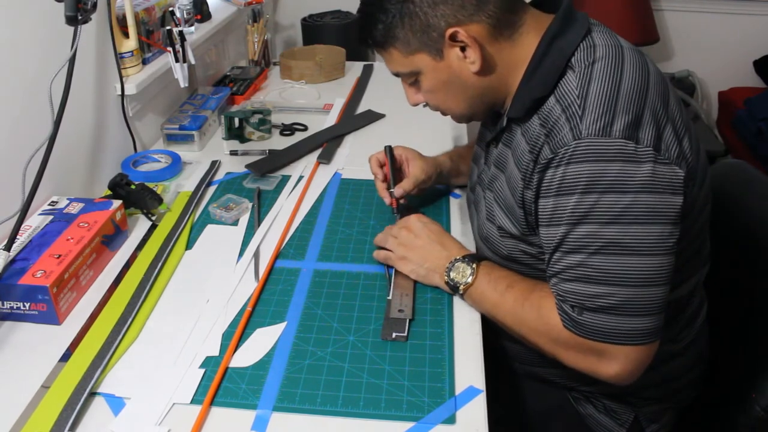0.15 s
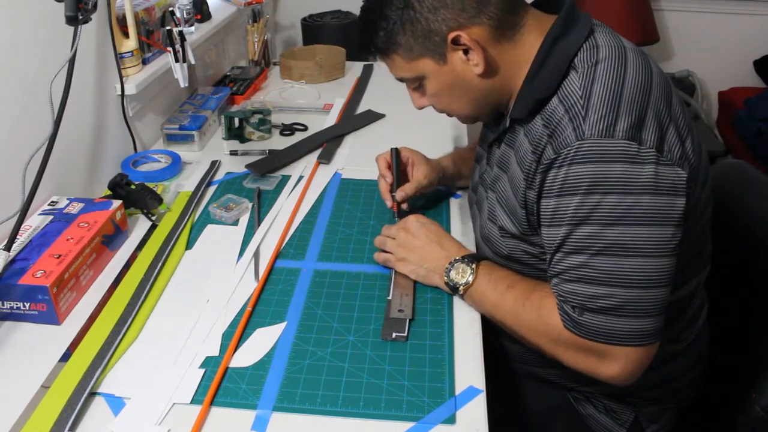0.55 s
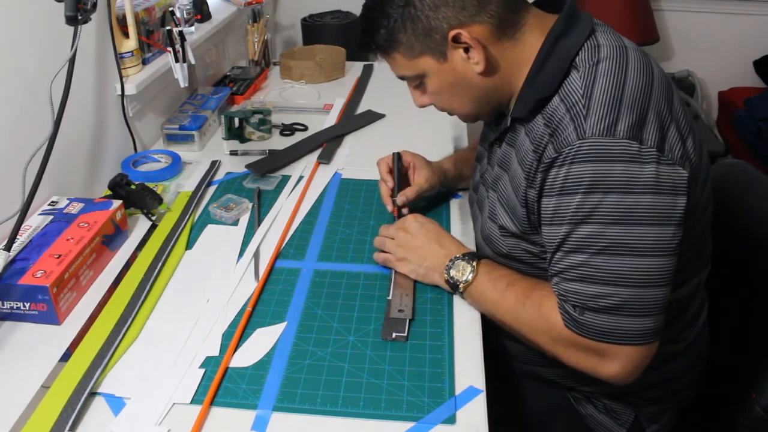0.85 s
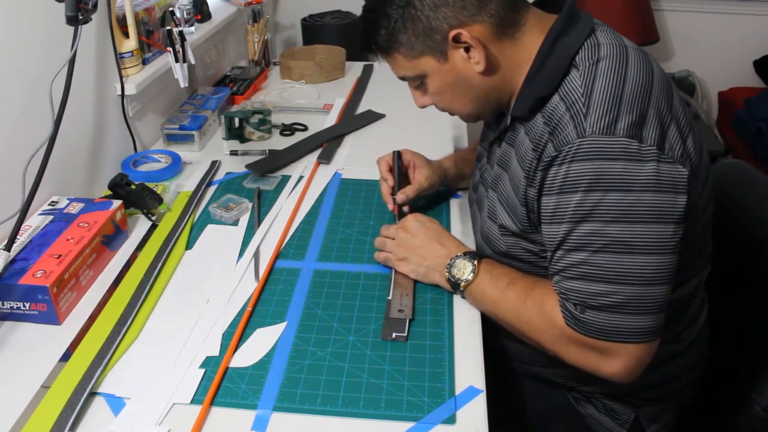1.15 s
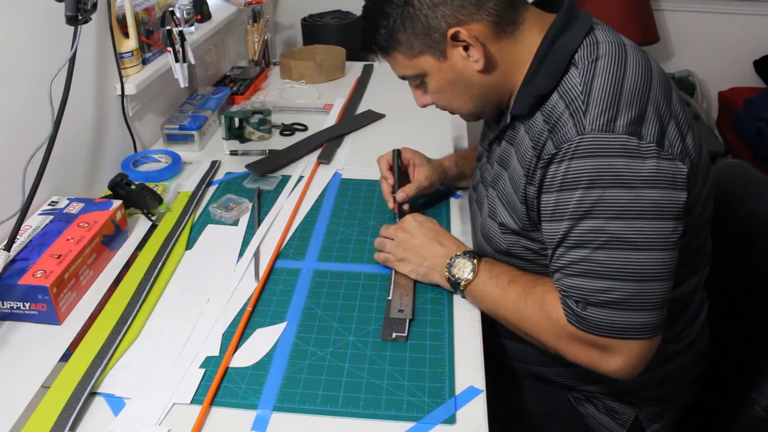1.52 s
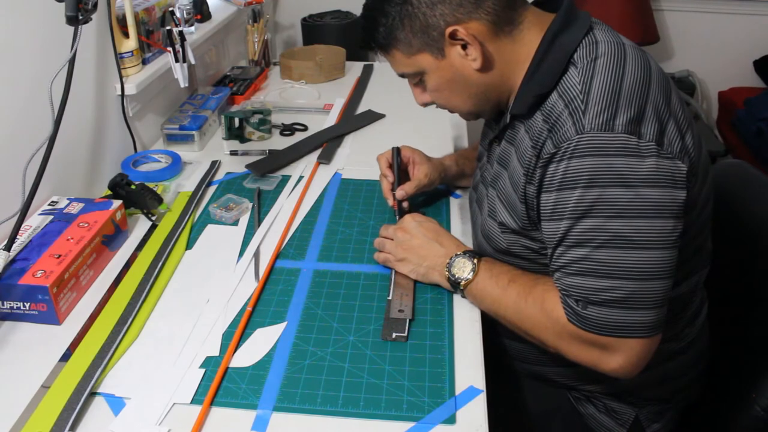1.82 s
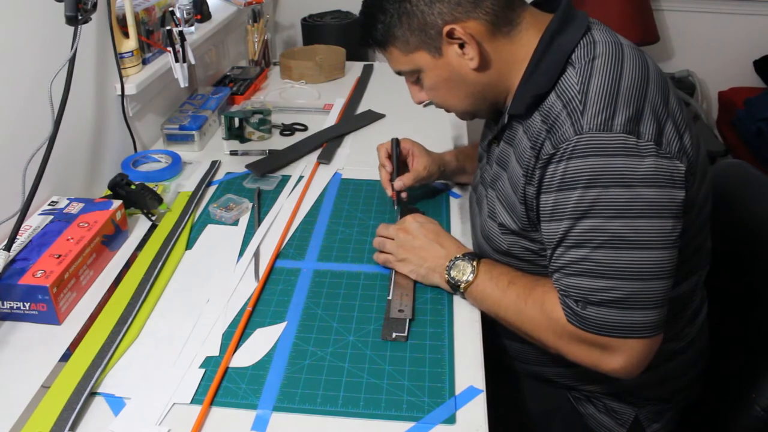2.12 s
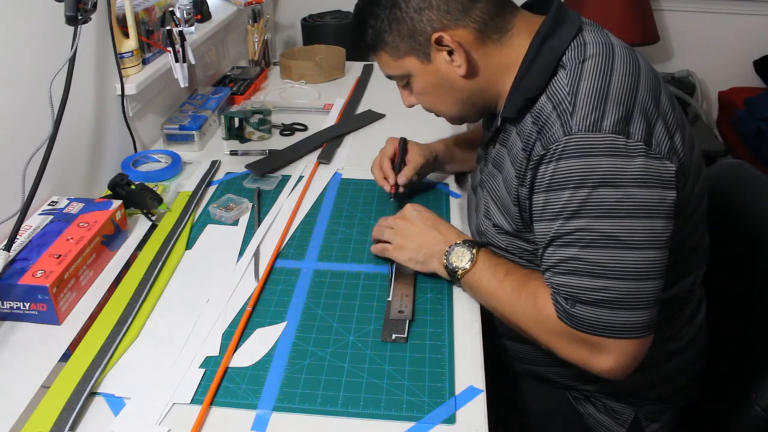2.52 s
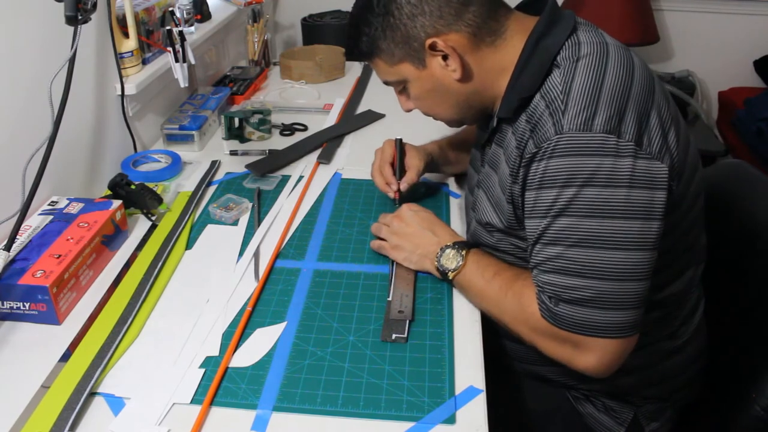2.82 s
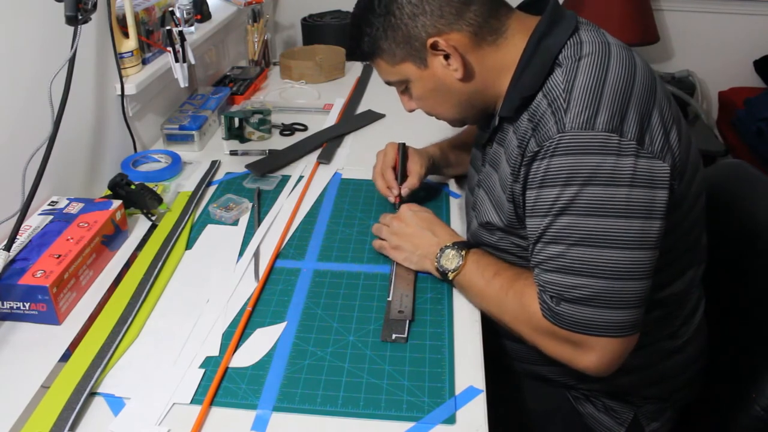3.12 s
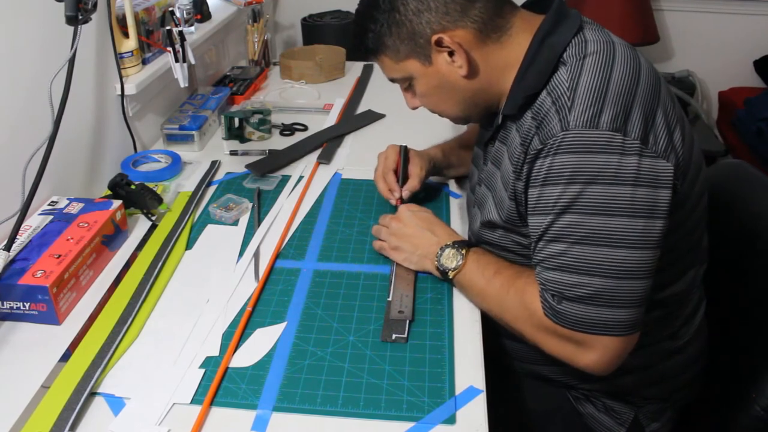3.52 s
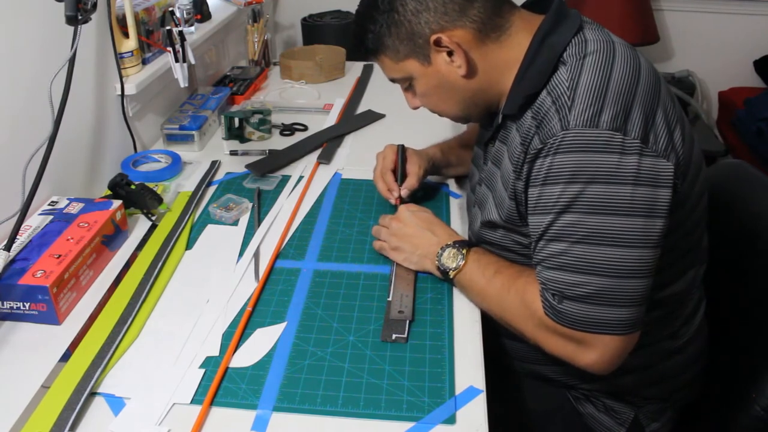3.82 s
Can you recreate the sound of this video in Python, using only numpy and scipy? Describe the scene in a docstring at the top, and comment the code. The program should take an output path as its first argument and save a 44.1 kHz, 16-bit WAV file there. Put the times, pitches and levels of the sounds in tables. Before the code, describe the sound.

A hobby knife crackles through foam sheet in short strokes, with sharp snaps at the start and around 0.6 seconds. After a light slide, more cuts come from 1.8 to 2.2 seconds, one briefly ringing the metal ruler. Foam and ruler shift from 2.4 seconds, with a soft desk knock at 3.3 and a last small cut near 3.9. A fan hums low throughout in the small room.

```python
"""A desk in a small room: a hobby knife cuts foam sheet along a metal ruler.
The blade crackles through the foam in short strokes and snaps onto the mat.
Foam and ruler are shifted, with one soft knock on the desk.
A fan motor hums throughout, beating slowly against the mains hum, over its own air noise."""
import sys
import numpy as np
from scipy import signal
from scipy.fft import rfft, irfft, next_fast_len
from scipy.io import wavfile

SR = 44100
rng = np.random.default_rng(int(sys.argv[2]) if len(sys.argv) > 2 else 0)


def wav_out(sig):
    """Save sig, one row per channel (or a flat mono array), as 16-bit PCM at SR to the path in sys.argv[1]."""
    wavfile.write(sys.argv[1], SR, np.round(np.clip(np.atleast_2d(sig).T, -1, 1) * 32767).astype(np.int16))


N = 174195


def undb(db):
    """Decibels to gain."""
    return 10 ** (np.asarray(db) / 20)


def unit(x):
    """Scale to rms 1."""
    return x / np.sqrt(np.mean(x ** 2))


def decay(t, t60_s):
    """Exponential fall, 60 dB in t60_s."""
    return np.exp(-np.log(1000) * t / t60_s)


def colour(x, points, tilt_db_oct=0):
    """Minimum-phase filter of unit power gain through (Hz, dB) points, tilted above 750 Hz."""
    size = next_fast_len(len(x) + 8192)
    size += size % 2
    octave = np.log2(np.maximum(np.fft.rfftfreq(size, 1 / SR), 1))
    hz, db = np.array(points).T
    tilt_db = tilt_db_oct * np.maximum(octave - np.log2(3000), -2)
    gain = unit(undb(np.interp(octave, np.log2(hz), db) + tilt_db))
    cepstrum = irfft(np.log(gain))
    cepstrum[1:size // 2] *= 2
    cepstrum[size // 2 + 1:] = 0
    return irfft(rfft(x, size) * np.exp(rfft(cepstrum)))[:len(x)]


def walk(rate_hz, n):
    """Smooth random wander, spread near 1."""
    steps = np.arange(n) * rate_hz / SR
    return np.interp(steps, np.arange(1024), rng.standard_normal(1024))


def add(track, start_s, x):
    """Mix x in at start_s."""
    i = max(int(start_s * SR), 0)
    track[i:i + len(x)] += x[:max(N - i, 0)]


def pan(x, left_db):
    """Stereo, left side raised by left_db against the right."""
    return x * undb(np.array([[left_db], [-left_db]]) / 2)


def ring(modes, t):
    """Struck modes dying away, unit energy."""
    x = sum(undb(db) * np.sin(2 * np.pi * hz * t) * decay(t, t60_s) for hz, db, t60_s in modes)
    return x / np.linalg.norm(x)


def fan_air():
    """Steady rush of the fan in the room's low resonances, faint hiss above."""
    # air noise spectra, mid and side: (frequency [Hz], relative density [dB])
    mid_spectrum = [(22, -38), (36, -10.5), (70, -8.5), (105, -11.5), (128, -8.5), (150, 3.5), (172, -3.5),
                    (187, -7), (215, -8.5), (262, -3.5), (285, -6.5), (305, -2.5), (365, -2.5),
                    (405, -11.5), (455, -22.5), (590, -17.5), (720, -23.5), (1100, -26.5), (2000, -33),
                    (4000, -37), (7000, -40.5), (8300, -39), (12000, -44), (15500, -49)]
    side_spectrum = [(18, -36), (30, -5), (48, -7), (85, -29), (97, -8.5), (117, -3), (177, -11),
                     (284, -10.5), (575, -14), (1260, -16.5), (7080, -27.5), (7860, -50), (8720, -61),
                     (10200, -71), (15500, -75)]
    mid = undb(-43) * unit(colour(rng.standard_normal(N), mid_spectrum))
    side = undb(-55) * unit(colour(rng.standard_normal(N), side_spectrum))
    return pan(np.array([mid + side, mid - side]), left_db=-0.06)


def fan_hum():
    """The motor runs just below twice the mains rate, so the two tones beat."""
    # motor harmonics: (multiple, level [dB])
    harmonics = [(1, -38), (2, -56.5), (3, -64.5), (5, -70.5)]
    # fan vibration: (frequency [Hz], level [dB])
    vibration_lines = [(36.3, -58), (54.5, -67.5), (488, -72), (552, -73.5), (763, -71)]
    motor_hz, mains_hum_hz, in_phase_s = 117.6, 119.99, 1.88
    t = np.arange(N) / SR - in_phase_s
    motor = sum(undb(db) * np.cos(2 * np.pi * k * motor_hz * t) for k, db in harmonics)
    mains = undb(-47) * np.cos(2 * np.pi * mains_hum_hz * t)
    shake = sum(undb(db) * np.cos(2 * np.pi * hz * t + .4 * walk(2, N)) for hz, db in vibration_lines)
    waver = undb(0.06 * walk(4.18, N))
    return pan(np.sqrt(2) * ((motor + mains) * waver + shake), left_db=1.06)


def room_response():
    """Quick reflections off desk and wall, then a short diffuse tail whose treble dies first."""
    t = np.arange(SR // 2) / SR
    noise, scatter = rng.standard_normal((2, len(t)))
    low = signal.lfilter(*signal.butter(1, 5000, fs=SR), noise)
    tail = low * decay(t, t60_s=0.4) + (noise - low) * decay(t, t60_s=0.26)
    tail *= np.clip(t / 0.011, 0, 1)
    early = scatter * np.abs(scatter) * np.exp(-t / 0.011) * (t > .001)
    return undb(-2) * (tail / np.linalg.norm(tail) + early / np.linalg.norm(early)) / np.sqrt(2)


def room(x):
    """Direct sound a little to the left, plus stereo reflections."""
    # width of the reflections: (frequency [Hz], side gain [dB])
    width = [(200, -14), (700, -14), (2000, -3), (5500, -1), (7500, -9), (12000, -21)]
    hz, db = np.array(width).T
    mid, side = (signal.fftconvolve(x, room_response())[:N] for _ in range(2))
    size = 2 ** 18
    side_db = np.interp(np.log(np.fft.rfftfreq(size, 1 / SR) + 1), np.log(hz), db)
    side = irfft(rfft(side, size) * undb(side_db))[:N]
    return pan(x, left_db=3.5) + pan(np.array([mid + side, mid - side]), left_db=1.5)


def desk_knock():
    """The hand sets the ruler down; the desk answers dully."""
    # desk modes: (frequency [Hz], relative level [dB], t60 [s])
    desk_modes = [(366, 0.5, 0.076), (470, -3, 0.043), (542, 1.5, .05), (605, -13, .04), (716, -26, .04)]
    out, t = np.zeros(N), np.arange(SR // 2) / SR
    knock = undb(-42.5) * np.sqrt(0.021 * SR) * ring(desk_modes, t)
    add(out, start_s=3.344, x=knock)
    return out


def friction(strokes, spectrum):
    """Dense tiny ruptures, bunched as the edge catches and slips; grit makes their sizes uneven."""
    attack_s, release_s = 0.0048, 0.022
    ruptures_per_s, catch_hz, catch_db = 6000, 126, 2
    n = SR // 2
    out, t = np.zeros(N), np.arange(n) / SR
    for start_s, length_s, db, tilt_db_oct, grit_db in strokes:
        ruptures = (rng.random(n) < ruptures_per_s / SR) * np.sign(rng.standard_normal(n))
        sizes = undb(grit_db * np.minimum(rng.exponential(size=n), 4))
        catching = undb(catch_db * walk(catch_hz, n))
        crackle = unit(ruptures * sizes * catching)
        push = np.clip(t / attack_s, 0, 1) * np.clip((length_s - t) / release_s + .5, 0, 1)
        add(out, start_s, undb(db) * colour(crackle * push, spectrum, tilt_db_oct))
    return out


def slides():
    """Foam and ruler rub over the mat."""
    # shifts: (start [s], length [s], relative level [dB], tilt [dB/octave], grit [dB])
    shifts = [(.87, .15, -52.5, -10.5, 2), (1.17, 0.087, -60, 0, 5), (2.425, 0.074, -49.5, -1, -1.5),
              (2.545, 0.027, -52, -2.5, 0), (2.695, 0.053, -54, 0, 4.5), (2.815, 0.049, -47, -1.5, 4),
              (2.93, 0.042, -49, -7.5, 8), (3.085, 0.085, -52.5, -0.5, 4.5), (3.33, .03, -55.5, -1, -1)]
    # rubbing spectrum: (frequency [Hz], relative density [dB])
    spectrum = [(200, -1), (500, 2.5), (900, 1), (1600, 0), (2600, -1), (3800, 0), (5500, -6), (7500, -10),
                (11000, -20), (15500, -23)]
    return undb(-5) * friction(shifts, spectrum)


def blade_snaps():
    """The blade breaks through: a crack, duller on soft contact, that can set the ruler ringing."""
    # snaps: (time [s], relative level [dB], tilt [dB/octave], ring against crack [dB], cutoff [Hz])
    snaps = [(.074, -43, 3, -12, 8040), (.53, -56, 6, -20, 13000), (.628, -44.5, 1, -20, 7000),
             (.6297, -41, -1.5, -17, 7000), (0.6329, -41, 1, -22, 8000), (.639, -43, -1.5, -20, 6000),
             (1.8383, -42.5, 2, 0, 12000), (1.8399, -39, 0.5, 5, 12000), (1.8433, -41, 3, -15, 15000),
             (2.0237, -38.5, 0.5, -18, 10000), (2.027, -39.5, 0, -7, 12000), (2.03, -46.5, 8, -15, 14000),
             (2.136, -44.5, -5.5, -12, 9000), (2.477, -53, -1, -10, 6000), (2.839, -51.5, 0.5, -15, 7000),
             (2.947, -58, -4, -15, 8000), (3.138, -50.5, 0, -15, 8000), (3.162, -50.5, -1, 1, 8000),
             (3.933, -47.5, 2, -4, 9000)]
    # crack spectrum: (frequency [Hz], relative density [dB])
    spectrum = [(200, -15), (600, -1.5), (1100, -0.5), (1700, 0.5), (2200, 3), (3200, 0.5), (3800, 1.5),
                (5300, 1.5), (6300, -10.5), (8500, -10.5), (12000, -12), (15500, -17)]
    # ruler modes: (frequency [Hz], relative level [dB], t60 [s])
    ruler_modes = [(1571, -10.5, 0.086), (2760, -4, .01), (2820, 4, 0.02), (3967, -15, .03),
                   (4570, -11, .03)]
    decay_s, level_window_s = 0.00073, 0.0039
    out, t = np.zeros(N), np.arange(SR // 4) / SR
    for start_s, db, tilt_db_oct, ring_db, cutoff_hz in snaps:
        burst = rng.standard_normal(len(t)) * np.exp(-t / decay_s)
        crack = colour(burst, spectrum, tilt_db_oct)
        crack = signal.lfilter(*signal.butter(2, cutoff_hz, fs=SR), crack)
        snap = crack / np.linalg.norm(crack) + undb(ring_db) * ring(ruler_modes, t)
        add(out, start_s, undb(db) * np.sqrt(level_window_s * SR) * snap)
    return undb(-3) * out


def blade_cuts():
    """The blade crackles through the foam in short strokes."""
    # strokes: (start [s], length [s], relative level [dB], tilt [dB/octave], grit [dB])
    strokes = [(0.0, 0.047, -45.5, 1.5, 1.5), (.058, 0.038, -43, 0, 4), (.49, 0.085, -59.5, 2, 8),
               (.617, 0.028, -53, 1, 2.5), (1.04, 0.021, -54.5, 1, 8), (1.79, 0.022, -55, 2, 2),
               (1.81, 0.056, -48.5, 6.5, 0), (1.997, .03, -54, 1, 6), (2.026, 0.077, -49, .5, 3.5),
               (2.092, 0.033, -43.5, 0, 5.5), (2.128, 0.065, -48, 0.9, 0), (3.866, 0.017, -49.5, 5, -8),
               (3.895, .07, -56, 5, 5.5)]
    # cutting spectrum: (frequency [Hz], relative density [dB])
    spectrum = [(200, -12), (500, 3.5), (900, 0.5), (1300, -4), (1650, 5.5), (2300, -4), (2800, -1.5),
                (3300, -1), (4000, -1.5), (5200, -4.5), (6500, -6), (8500, -10.5), (12000, -18.5),
                (15500, -24)]
    return undb(-4) * friction(strokes, spectrum)


def scene():
    """Work at the desk, heard in the room over the fan."""
    work = blade_cuts() + slides() + blade_snaps() + desk_knock()
    return room(work) + fan_hum() + fan_air()


def record(dry):
    """Steep low-pass on the top treble."""
    cutoff_hz = 15750
    return signal.sosfilt(signal.ellip(10, .1, 80, cutoff_hz, fs=SR, output="sos"), dry)


dry = scene()
out = record(dry)
wav_out(out)
```